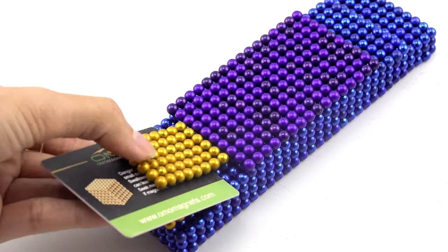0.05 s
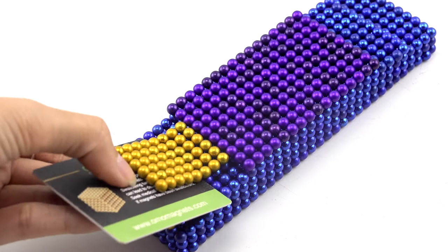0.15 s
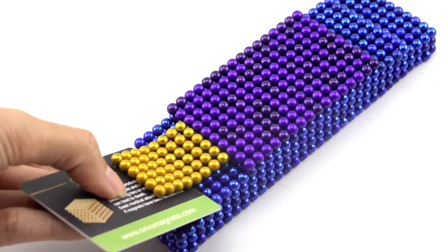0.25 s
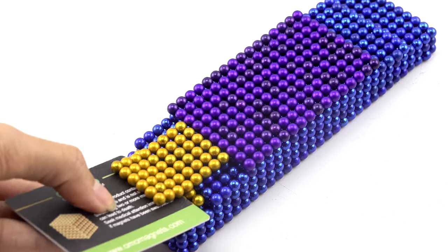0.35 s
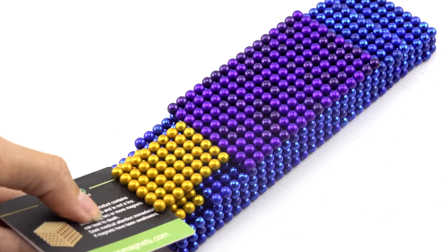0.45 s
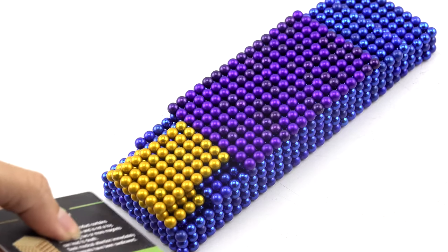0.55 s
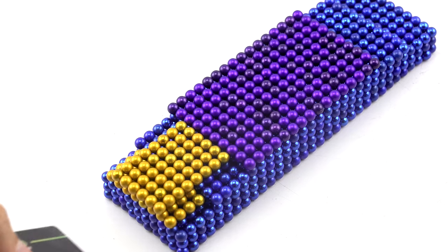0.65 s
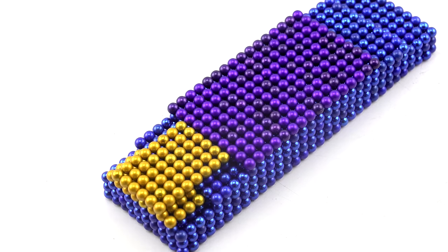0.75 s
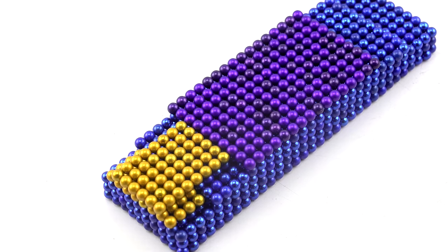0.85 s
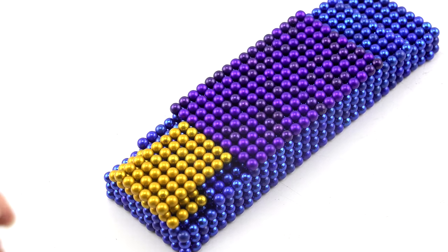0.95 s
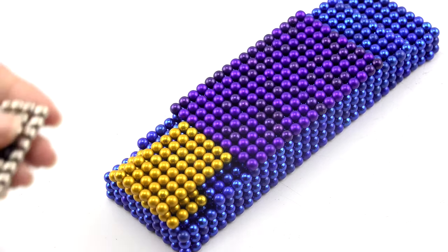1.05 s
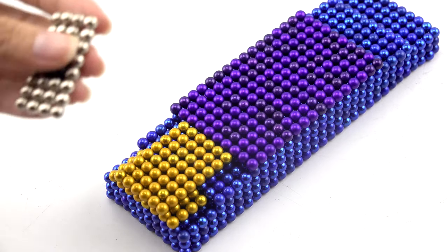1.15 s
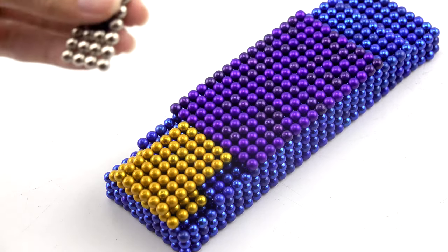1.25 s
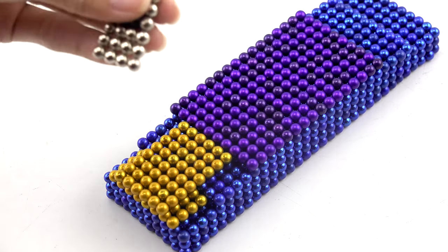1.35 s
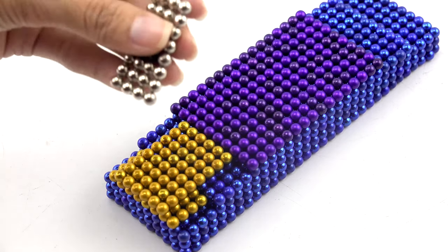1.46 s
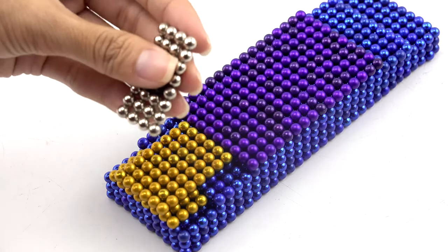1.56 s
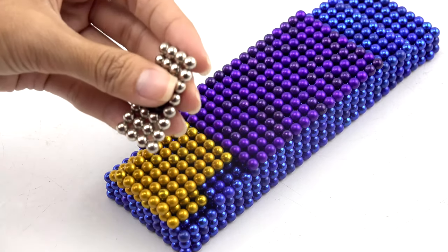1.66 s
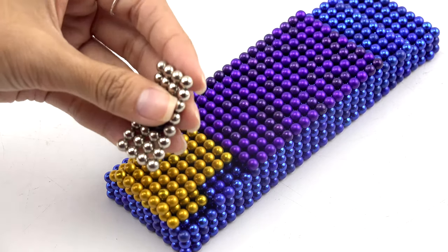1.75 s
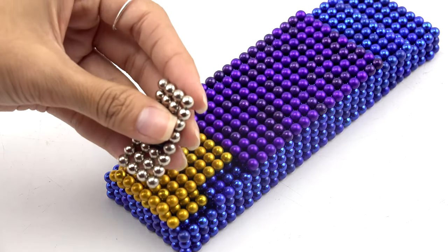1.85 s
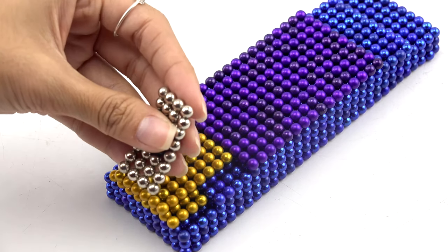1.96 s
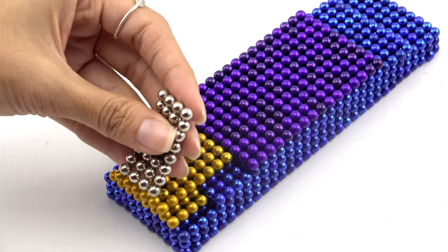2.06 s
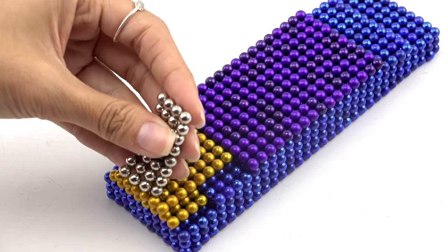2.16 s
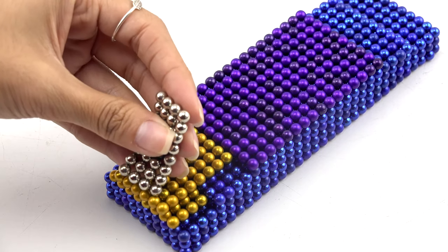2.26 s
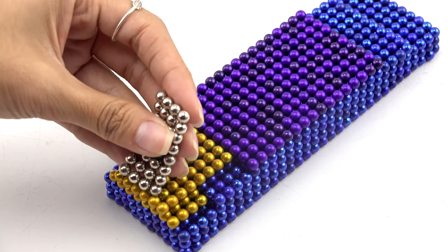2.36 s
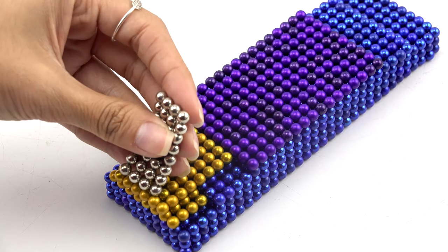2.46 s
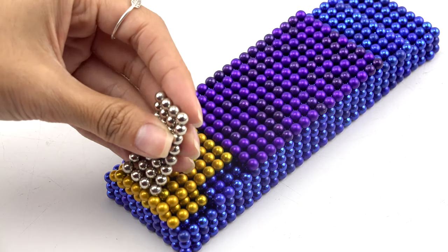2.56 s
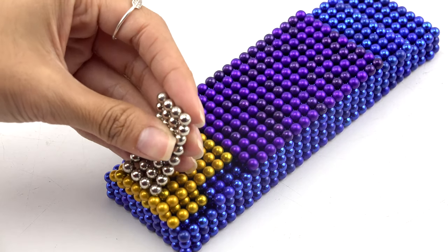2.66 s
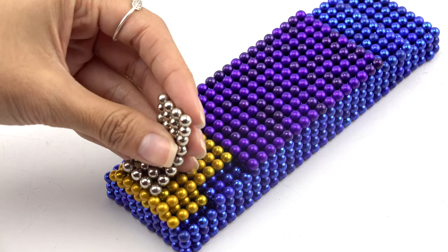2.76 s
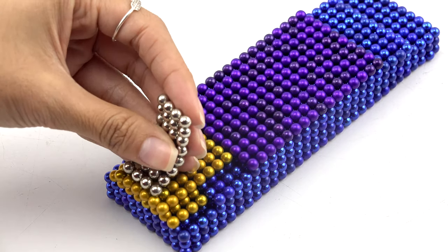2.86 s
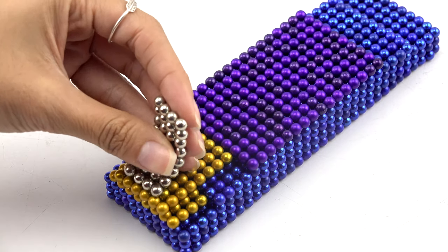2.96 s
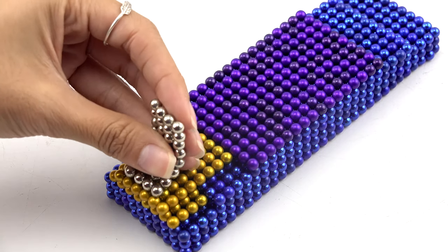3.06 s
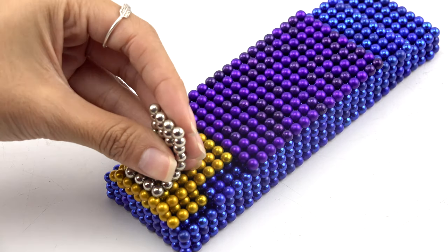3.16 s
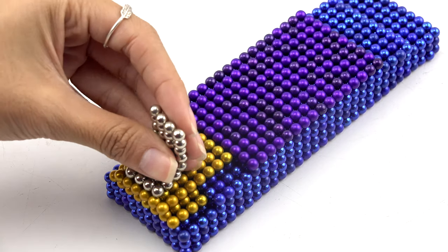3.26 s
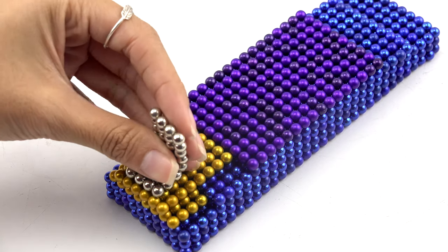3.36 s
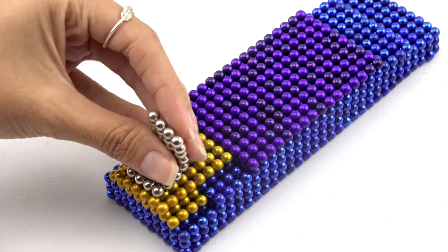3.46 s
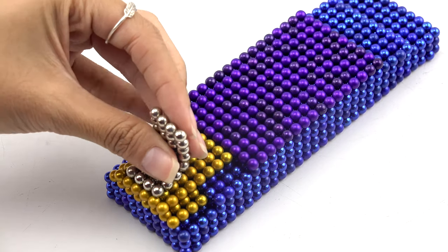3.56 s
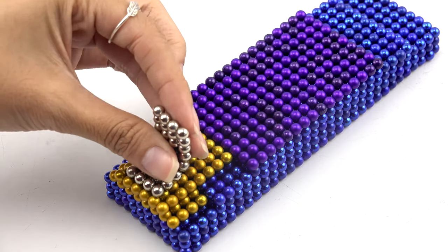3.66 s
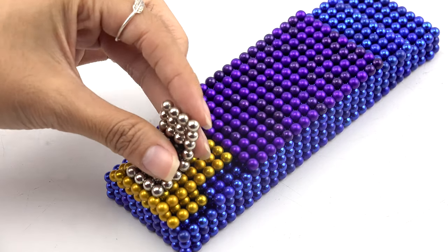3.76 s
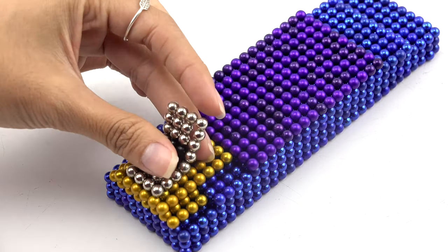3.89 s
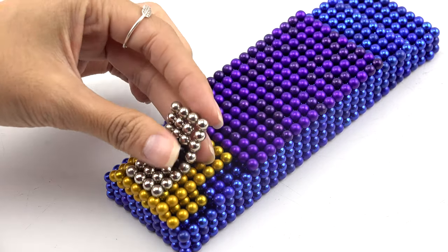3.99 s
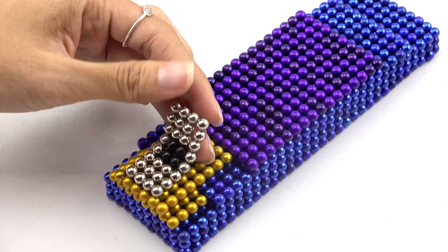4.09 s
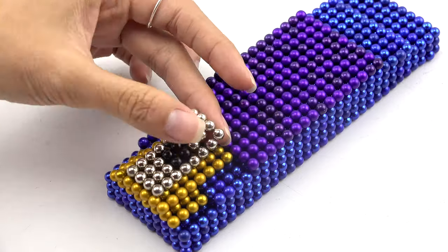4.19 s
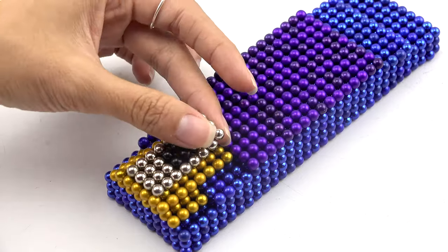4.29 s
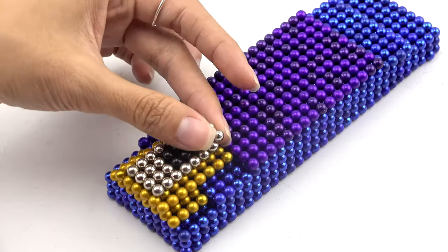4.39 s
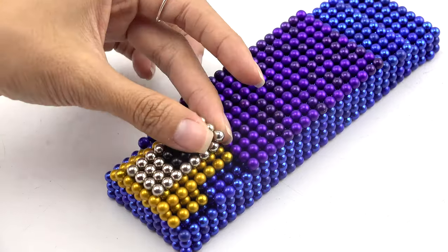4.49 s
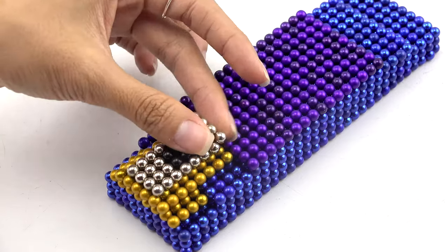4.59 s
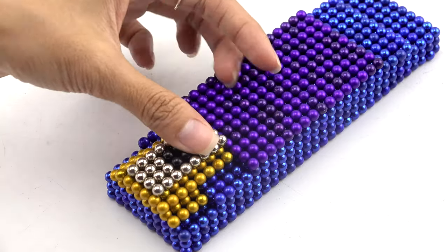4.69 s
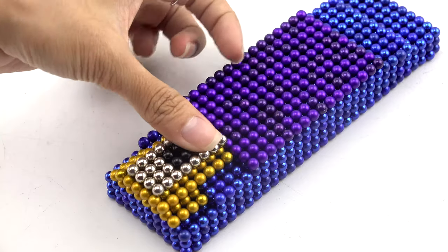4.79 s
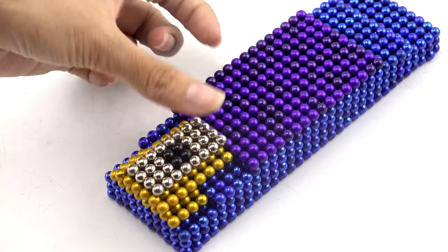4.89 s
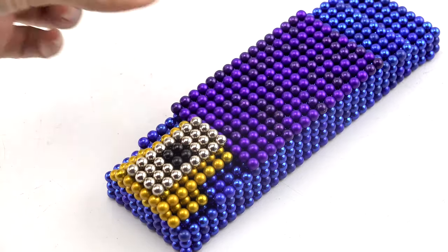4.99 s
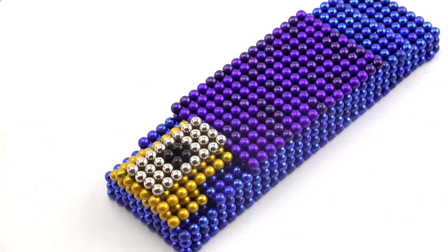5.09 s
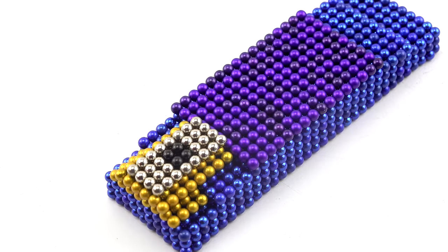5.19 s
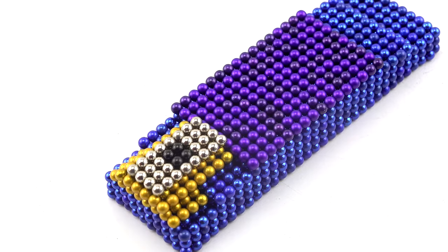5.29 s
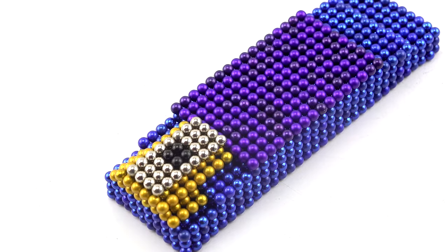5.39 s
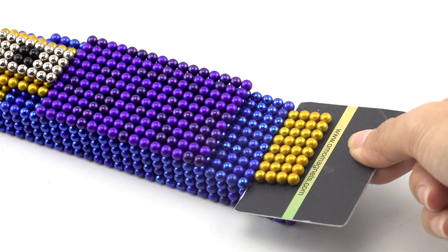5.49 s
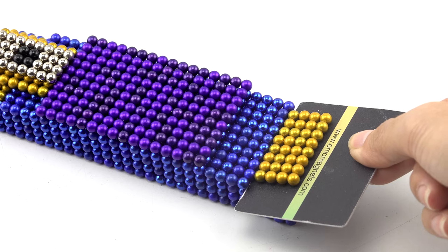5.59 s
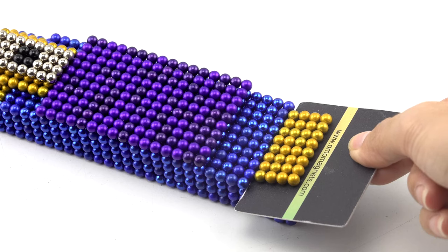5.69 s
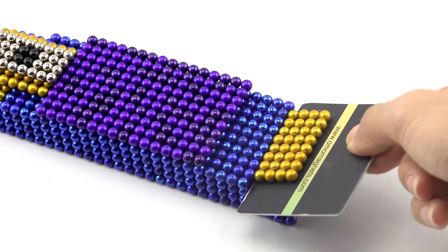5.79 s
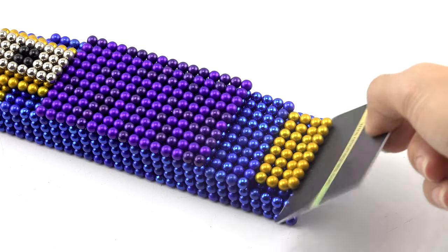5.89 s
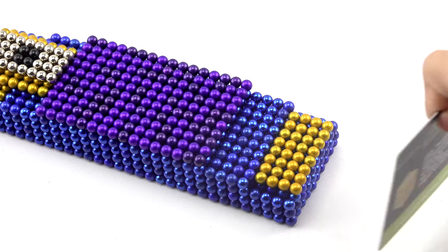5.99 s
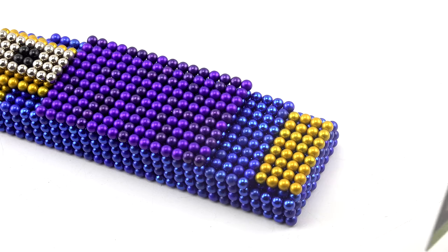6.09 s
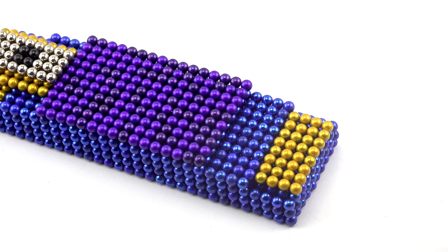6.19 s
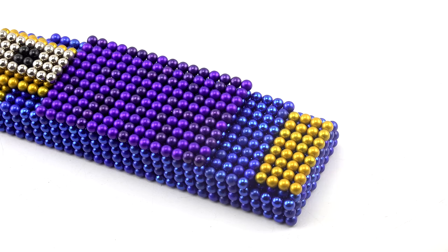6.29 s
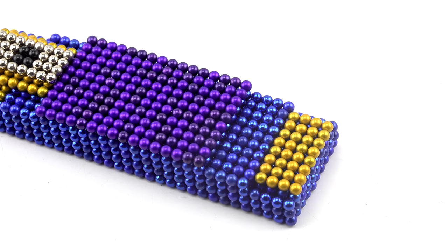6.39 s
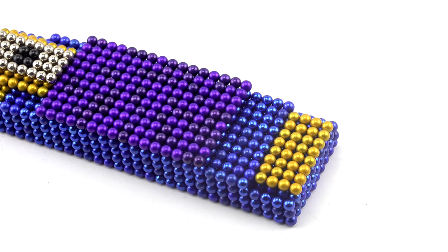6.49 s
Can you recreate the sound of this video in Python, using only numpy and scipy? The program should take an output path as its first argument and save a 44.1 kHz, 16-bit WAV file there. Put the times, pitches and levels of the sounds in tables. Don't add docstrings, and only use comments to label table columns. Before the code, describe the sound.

Close up, rows of metal balls clatter home in a burst, pause, click down piecemeal, and finish with a rapid rattling cascade over fan hum.

```python
import sys
import numpy as np
from scipy import signal
from scipy.fft import rfft, irfft
from scipy.io import wavfile
from scipy.ndimage import uniform_filter1d

SR = 44100
rng = np.random.default_rng(int(sys.argv[2]) if len(sys.argv) > 2 else 0)


def nominal_scale(level):
    x = np.asarray(level, float) / 20
    return 10 ** x


def bounce(signal):
    frames = np.transpose(np.atleast_2d(signal))
    limited = np.clip(frames, -1, 1)
    pcm = np.round(limited * 32767).astype(np.int16)
    wavfile.write(sys.argv[1], SR, pcm)


N = 288414

# t/s, height of the click step [full scale], hiss let through/dB
SCENE_CHANGES = [
    (1.0238, 0.027, -3),
    (4.2624, .005, -6),
    (5.4947, 0.033, -5.5),
    (6.4292, .017, -5.5),
    (6.5385, 0.019, -3.5),
]
HISS_DB = -55


def band(x, hz, width):
    return signal.lfilter(*signal.iirpeak(hz, hz / width, fs=SR), x)


def unit(x):
    return x / np.sqrt(np.mean(x ** 2))


def hum():
    # t/s, lower mode level/dB, upper mode level/dB, rumble level/dB, rustle level/dB
    wavering = [(0.0, -42, -32.5, -62, -62), (0.09, -33.5, -37, -45, -57), (0.13, -37, -30.5, -59, -62),
                (0.2, -31.5, -31.5, -53, -61.5), (0.25, -24.5, -49, -54, -63),
                (0.38, -42.5, -32, -62, -60.5), (0.6, -40, -33.5, -51, -64.5), (0.64, -30, -32, -65, -64),
                (0.69, -41, -40, -64, -68), (0.75, -41, -44, -74.5, -59.5),
                (0.97, -43.5, -37.5, -55.5, -60), (1.07, -28, -30.5, -49, -61),
                (1.16, -33.5, -35.5, -46, -62), (1.24, -46.5, -47.5, -28.5, -63),
                (1.29, -32.5, -42.5, -51.5, -61), (1.33, -28, -39, -41, -60),
                (1.42, -29, -33.5, -64, -62.5), (1.46, -43, -37.5, -54, -59.5),
                (1.51, -26, -43.5, -58.5, -65), (1.71, -30.5, -39, -60.5, -59.5),
                (1.78, -50, -36.5, -66, -60.5), (1.82, -34.5, -35.5, -56, -64.5),
                (1.97, -34.5, -31.5, -65, -60.5), (2.0, -30.5, -42.5, -46.5, -62.5),
                (2.06, -47, -51.5, -55, -64), (2.15, -44, -39.5, -62.5, -61),
                (2.24, -27.5, -27, -43, -68.5), (2.39, -47.5, -47.5, -73.5, -70),
                (2.44, -44.5, -45, -64.5, -61), (2.77, -41.5, -36, -71, -70),
                (2.88, -43.5, -46, -67, -60.5), (2.99, -45.5, -34.5, -77.5, -62.5),
                (3.02, -40, -31, -56.5, -58.5), (3.19, -45, -54.5, -76, -67),
                (3.24, -41, -39.5, -66, -56.5), (3.28, -49.5, -62, -58.5, -72),
                (3.37, -48.5, -38.5, -72.5, -72), (3.57, -49, -43, -69.5, -66.5),
                (3.7, -51.5, -59, -74, -60.5), (3.81, -50, -36, -68, -62), (3.95, -27, -42.5, -41.5, -71.5),
                (4.08, -59, -47, -65, -56), (4.13, -40, -50.5, -58.5, -62), (4.19, -62, -48, -59.5, -62),
                (4.3, -33, -27.5, -40, -62), (4.35, -42, -37, -48.5, -64), (4.41, -15, -49, -46.5, -61),
                (4.5, -41, -30, -47.5, -59), (4.57, -33.5, -33, -38, -62), (4.64, -35.5, -31, -56.5, -62),
                (4.68, -31, -32.5, -40, -64.5), (4.73, -28.5, -23, -40, -59), (4.79, -30, -39, -50, -66),
                (4.97, -41.5, -33.5, -70.5, -62), (5.03, -43.5, -36, -61.5, -60),
                (5.21, -41, -40, -66.5, -62.5), (5.37, -42, -33, -56, -64.5),
                (5.43, -36.5, -42.5, -68, -58.5), (5.54, -44.5, -34, -38.5, -65),
                (5.74, -33.5, -34.5, -58.5, -58.5), (5.81, -31.5, -30, -55, -59.5),
                (5.88, -46.5, -44, -64.5, -60.5), (5.96, -29, -32.5, -47.5, -58.5),
                (6.01, -48, -46, -52, -58.5), (6.08, -32.5, -37, -53, -64), (6.16, -40, -31, -58.5, -63),
                (6.36, -42, -37, -64.5, -57.5), (6.41, -38.5, -40, -49.5, -67),
                (6.54, -43, -25, -42.5, -68)]
    # f/Hz, width/Hz
    hum_modes = [(115.64, 18), (151.7, 17), (51.4, 22)]
    # f/Hz, level per Hz/dB
    rustle_colour = [(100, -31), (170, -0.5), (209, -12), (268, -36.5), (325, -32), (472, -44), (552, -39),
                     (1090, -45.5), (1830, -60.5), (3000, -71.5), (3900, -102), (6600, -120)]
    t = np.arange(N) / SR
    times, *columns = np.transpose(wavering)
    gains = [nominal_scale(np.interp(t, times, column)) for column in columns]
    out = 0
    for (hz, width), gain in zip(hum_modes, gains):
        noise = band(rng.standard_normal(N), hz, width)
        mode = signal.hilbert(band(noise, hz, width * 2))
        steady = mode.real / (np.abs(mode) + 0.1 * np.std(mode)) ** 0.61
        out = out + gain * unit(steady)
    f, db = np.transpose(rustle_colour)
    freq = np.maximum(np.arange(N // 2 + 1) * SR / N, 1)
    colour = nominal_scale(np.interp(np.log(freq), np.log(f), db, left=-80, right=-80))
    rustle = irfft(rfft(rng.standard_normal(N)) * colour, N)
    return out + gains[3] * unit(rustle)


def room(x):
    # f/Hz, t60/s, level/dB
    tail_bands = [(302, 0.16, -12.5), (850, 0.14, -10.5), (1600, 0.25, -10.5), (3246, 0.38, -14),
                  (6330, .27, -15.5), (12000, 0.069, -7.5)]
    t = np.arange(SR // 2) / SR
    tail = np.zeros(len(t))
    for hz, t60, db in tail_bands:
        noise = unit(band(rng.standard_normal(len(t)), hz, hz * 0.89))
        tail += nominal_scale(db) * np.sqrt(1 / SR / t60) * noise * nominal_scale(-60 * t / t60)
    tail *= 2.406 * np.clip(t / 0.0024, 0, 1)
    return x + signal.fftconvolve(x, tail)[:N]


def bumps():
    # t/s, level/dB, f/Hz, t60/s
    hand_bumps = [
        (1.512, -44, 700, 0.15),
        (1.176, -66, 6500, 0.0091),
        (5.34, -59.5, 530, 0.09),
    ]
    out = np.zeros(N + 8192)
    t = np.arange(4096) / SR
    for s, db, hz, t60 in hand_bumps:
        thud = unit(band(rng.standard_normal(4096), hz, hz / 4))
        out[int(s * SR):][:4096] += nominal_scale(db) * thud * nominal_scale(-60 * t / t60)
    return out[:N]


def ring(x, modes, scatter_db, detune):
    chance = rng.standard_normal((len(modes), 3))
    y = np.zeros(len(x))
    for (hz, width, db), (sign, gain, pitch) in zip(modes, chance):
        mode = band(x, hz * (1 + detune * pitch), width)
        y += np.sign(sign) * nominal_scale(db + scatter_db * gain) * mode
    return y / np.abs(y).max()


def snap(hz, treble_db, knock_db, cascade_ms, count=14, size=2048):
    # f/Hz, width/Hz, level/dB
    slab_modes = [(1500, 360, -6.5), (2050, 350, -5.5), (2800, 450, -2), (3400, 400, 0), (4000, 410, -3.5),
                  (5130, 700, -9)]
    # f/Hz, width/Hz, level/dB
    tick_modes = [(6700, 1600, 4.5), (8060, 1800, 5), (10580, 2400, -6.5), (13300, 9700, -10)]
    # f/Hz, width/Hz, level/dB
    knock_modes = [(570, 200, -2.5), (900, 130, 3.5), (1095, 200, 9.5), (300, 170, -12.5)]
    when = rng.random(count) ** 1.5 * 2.5
    when[0] = 0
    at = (when * np.clip(cascade_ms, 0.2, 12) * SR / 1000).astype(int)
    force = np.exp(-when) * nominal_scale(4.0 * rng.standard_normal(count))
    blows = np.zeros(size)
    np.add.at(blows, at, force * rng.choice([-1, 1], count))
    slab = ring(blows, slab_modes + [(hz, 350, 3)], scatter_db=3.0, detune=0.059)
    slab = signal.sosfilt(signal.butter(2, 1100, "high", fs=SR, output="sos"), slab)
    tick = ring(blows, tick_modes, scatter_db=0.5, detune=0.053)
    knock = ring(blows, knock_modes, scatter_db=3.0, detune=0.049)
    return slab + nominal_scale(treble_db + 9.5) * tick + nominal_scale(knock_db + 1.5) * knock


def balls():
    # t/s, blow level/dB, slab ring f/Hz, treble level/dB, knock level/dB, cascade time/ms
    card_out = [(0.045, -17, 2169, -23, -47.5, 3.7), (0.0615, -4.5, 2157, -29.5, -48.5, 2.92),
                (0.0695, -1.5, 3296, -21.5, -31.5, 2.77), (0.0784, 4, 3735, -23, -31, 2.48),
                (0.1034, -17.5, 3760, -21.5, -37.5, 3.6), (0.123, -4.5, 2550, -21.5, -36, 3.3),
                (0.1265, 1.5, 3104, -21, -38, 3), (0.131, 7.5, 3746, -20, -33.5, 2.97),
                (0.1394, 2, 3300, -23.5, -44, 3), (0.1482, 0.5, 3283, -24, -40.5, 2.95),
                (0.1722, -8, 3760, -27.5, -33.5, 2.9), (0.1997, -9, 1517, -21, -31, 1.7),
                (0.2114, -1.5, 3490, -17.5, -30, 2.6), (0.2137, 7.5, 3366, -21.5, -32.5, 3),
                (0.2207, 1.5, 3956, -16.5, -32.5, 3), (0.2279, -4.5, 3680, -22, -43, 3),
                (0.2374, -11, 3560, -20.5, -35.5, 3), (0.2727, -9.5, 2224, -25.5, -38.5, 3.2),
                (0.2927, -6, 1800, -28, -29.5, 2.72), (0.3416, -12, 2208, -27.5, -39, 4),
                (0.362, -13.5, 2135, -19.5, -35, 1.5), (0.3714, 1, 1867, -13, -32.5, 3.34),
                (0.3752, 2, 3258, -17.5, -34.5, 3), (0.3827, -6.5, 1952, -25.5, -37.5, 2.8),
                (0.4536, -0.5, 1550, -18, -36, 3), (0.4632, 9, 3323, -12, -37, 3),
                (0.4688, -4.5, 1742, -15, -35, 3.15), (0.4777, -7, 1973, -19, -28, 2.9),
                (0.5224, -11.5, 1510, -3.5, -29.5, 3.35), (0.5313, 4, 1520, -9.5, -34, 2.78),
                (0.5335, 4.5, 2920, -13, -31.5, 3), (0.5474, -3, 2912, -16, -25.5, 3.1),
                (0.5857, -3.5, 1794, -23, -40, 3.24), (0.5863, 4.5, 1698, -2.5, -33.5, 2.69),
                (0.5989, 2, 3614, -14, -35.5, 3.35), (0.6244, -5, 2674, -16, -38, 3.5)]
    placing = [(2.2293, -4, 1880, -17.5, -14, 2), (2.2293, -3.5, 1880, -15, -14, 2),
               (2.2344, -12.5, 3100, -11.5, -14.5, 2), (3.048, 7.5, 2800, -16.5, -29, 2),
               (3.0544, -5.5, 3440, -12, -13, 2), (3.1946, -18, 1900, -13, -21.5, 2),
               (3.2106, -3, 1560, -15, -27, 2), (3.2164, -12.5, 3600, -17, -21, 2),
               (3.4211, -12.5, 2770, -27, -33, 2), (3.5184, -17, 1570, -17, -36, 2),
               (3.5543, -5.5, 2780, -12.5, -17.5, 2), (3.5728, -5, 2930, -16, -23.5, 2),
               (3.5784, -16, 1570, -14, -13, 2), (3.6052, -3.5, 1480, -13, -10.5, 2),
               (3.6104, -29, 1560, -22, 1, 2), (3.906, 1.5, 2810, -8, -17, 2),
               (3.9114, -3.5, 3000, -8.5, -27.5, 2), (3.9509, -14, 1780, -37, -6.5, 2),
               (3.9574, -12, 2800, -11, -27, 2), (4.0731, -14.5, 3100, -30, -15.5, 2),
               (4.0874, -23, 4000, -15.5, -21.5, 2), (4.1334, -32, 3300, -7, -38, 2),
               (4.3214, -55, 1500, -11, -7, 2), (4.3954, -6, 2440, -23.5, -19.5, 2),
               (4.4004, -2, 1570, -29, -31, 2), (4.4064, -15.5, 2430, -25.5, -10, 2),
               (4.4643, -37.5, 3510, -34, -9, 2), (4.5007, -25, 1600, -35.5, -27, 2),
               (4.6917, -7.5, 3300, -11.5, -49, 2), (4.7022, 7.5, 2724, -7.5, -20.5, 2),
               (4.7054, -3, 4200, -17, -45.5, 2), (4.7114, -7.5, 3340, -8, -36, 2),
               (4.7234, -22, 2230, -15.5, -31.5, 2), (4.7324, -5.5, 3500, -22, -35, 2)]
    card_pull = [(5.8646, -33.5, 2220, -42.5, -25.5, 4), (5.877, -25, 2276, -38, -41, 4),
                 (5.892, -26, 2727, -34, -27, 4), (5.8963, -18.5, 1753, -23.5, -30, 4),
                 (5.9053, -8.5, 2466, -11, -13, 4), (5.914, 6, 3110, -18, -28.5, 4),
                 (5.9238, 3.5, 2186, -16, -30.5, 4), (5.9349, -4, 2220, -23.5, -23.5, 4),
                 (5.9449, 3.5, 1920, -17, -22, 4), (5.9492, 5.5, 3030, -14, -21.5, 4),
                 (5.9547, 10, 3698, -17.5, -25.5, 4), (5.9722, 8, 2736, -11, -20.5, 4),
                 (5.9785, 6.5, 3675, -14.5, -20, 4), (5.9903, 5, 3400, -11, -31, 4),
                 (5.9962, 0.5, 2764, -9.5, -32.5, 4), (6.0199, -1, 2995, -17.5, -26, 4),
                 (6.0288, 5, 3865, -14, -32, 4), (6.0351, 0, 2268, -18, -31, 4),
                 (6.0446, -1.5, 3730, -16, -29.5, 4), (6.0521, -1.5, 3840, -14.5, -34.5, 4),
                 (6.061, 3.5, 2995, -19, -38, 4), (6.0686, 11, 3360, -18, -24, 4),
                 (6.0852, 3.5, 3406, -16, -45, 4)]
    out = np.zeros(N + 8192)
    for s, db, *how in card_out + placing + card_pull:
        out[int(s * SR):][:2048] += nominal_scale(db + 2.0) * snap(*how)
    return out[:N]


def scene():
    return (room(balls() + bumps()) + hum())[None]


def denoise(x, over_db, depth_db, learn_db_per_s, from_hz):
    f, t, z = signal.stft(x, SR, nperseg=1024, noverlap=768)
    power = uniform_filter1d(np.abs(z) ** 2, size=9, axis=0)
    power = uniform_filter1d(power, size=3, axis=1)
    treble_only = 1 / (1 + (from_hz / (f[:, None] + 1)) ** 4)
    hiss = nominal_scale(HISS_DB + over_db) ** 2 * 3 / 1024 * treble_only
    least = np.full(len(t), nominal_scale(depth_db))
    for s, _, db in SCENE_CHANGES:
        least = np.maximum(least, (t > s) * nominal_scale(db - learn_db_per_s * np.abs(t - s)))
    gain = np.maximum((power / (power + hiss)) ** 2, least)
    return signal.istft(z * gain, SR, nperseg=1024, noverlap=768)[1][:N]


def low_pass(x):
    return signal.sosfilt(signal.butter(12, 14000, fs=SR, output="sos"), x)


def record(dry):
    t = np.arange(N) / SR
    hiss = nominal_scale(HISS_DB) * rng.standard_normal(N)
    whine = nominal_scale(-69) * np.sin(2 * np.pi * 9900 * t)
    x = dry[0] + hiss + whine
    x = denoise(x, over_db=8.5, depth_db=-24.5, learn_db_per_s=45, from_hz=2300)
    for s, step, _ in SCENE_CHANGES:
        x = x + step * (t >= s) * np.exp(-np.abs(t - s) / 0.0013)
    return low_pass(np.clip(x, -1, 1)[None])


dry = scene()
out = record(dry)
bounce(out)
```